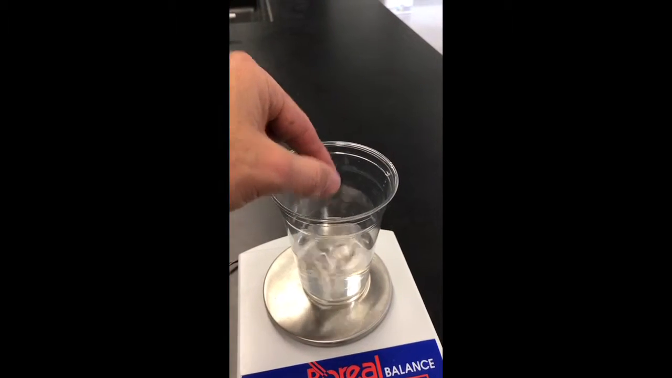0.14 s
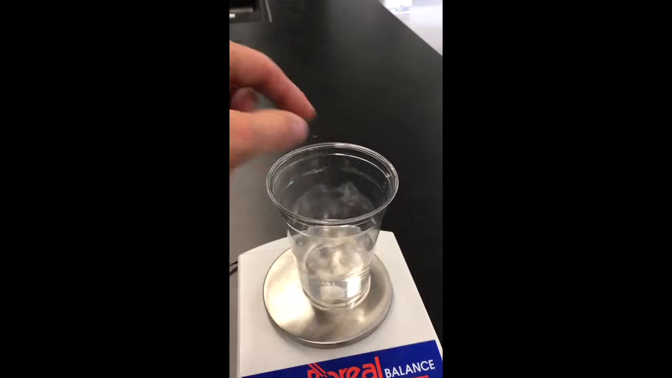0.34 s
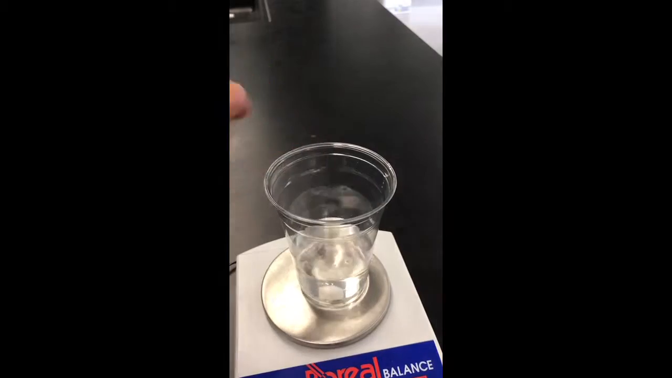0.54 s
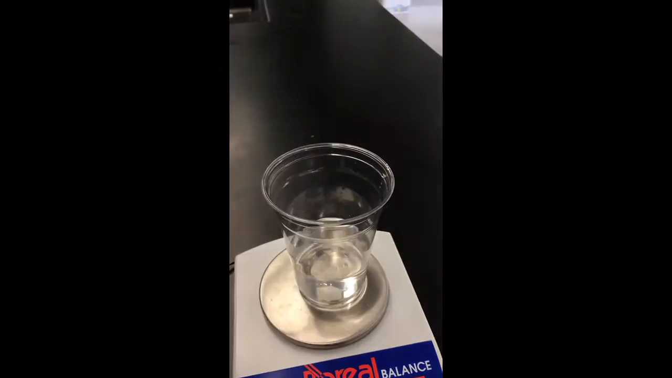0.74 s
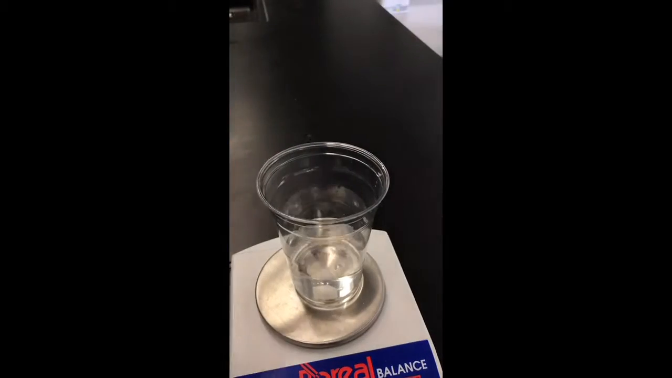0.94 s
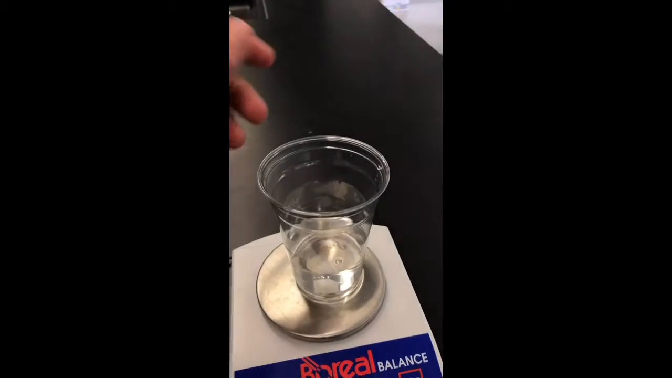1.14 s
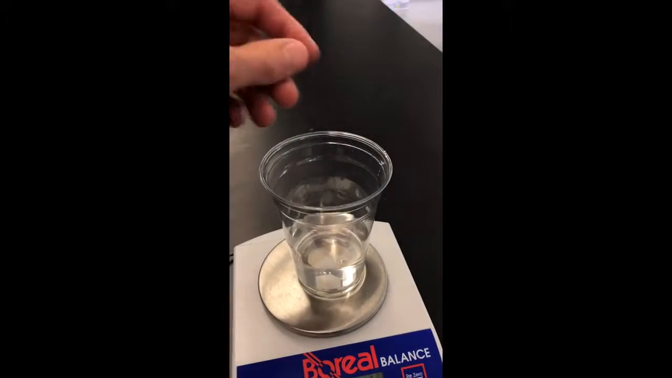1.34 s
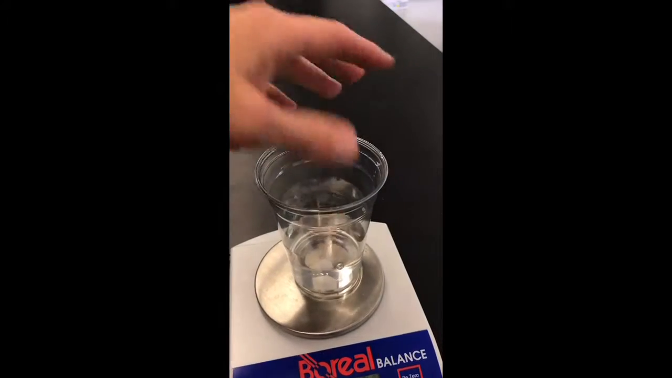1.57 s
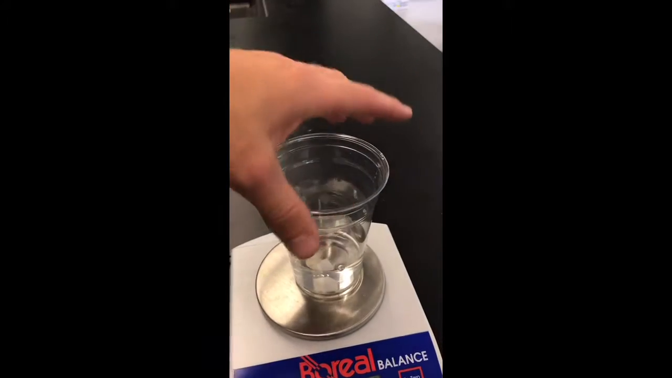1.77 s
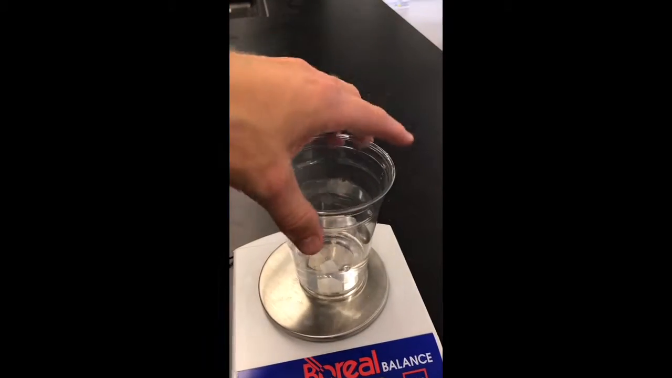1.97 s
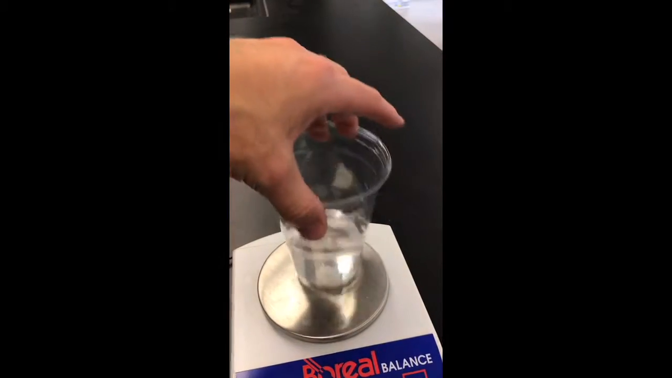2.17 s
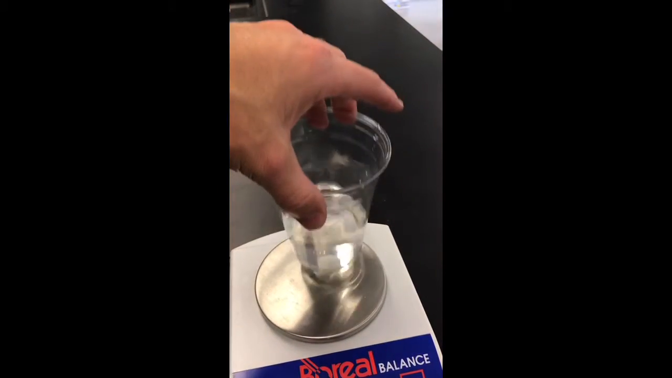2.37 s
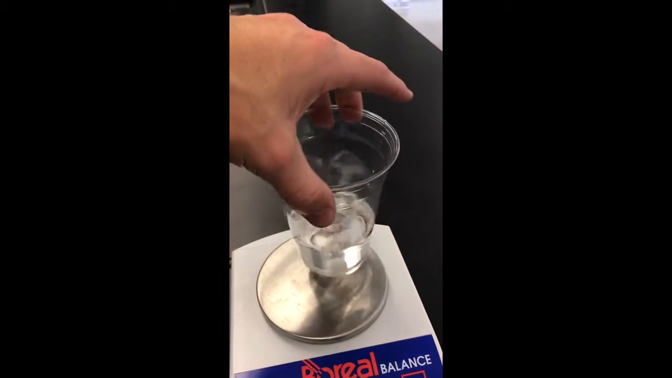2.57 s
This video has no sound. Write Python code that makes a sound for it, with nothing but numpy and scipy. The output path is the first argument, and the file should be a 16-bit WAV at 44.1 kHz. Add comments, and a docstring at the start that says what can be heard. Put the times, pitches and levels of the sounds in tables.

```python
"""Sugar cube in a plastic cup

A cube drops into a thin plastic cup with a little water: struck modes and noisy cracks make the knocks
and the settling rattle, and short swelling sines make the plops of closing air pockets.
Small ticks, short pitched noise bursts, are scattered before, among and after the knocks;
later something rubs on the cup, as resonant noise and hiss.
A quiet hard room answers with one wall echo and a decaying noise tail.
Behind it all lie patchy ventilation noise, wavering hum lines and a thin high whistle."""
import sys
import numpy as np
from scipy import signal
from scipy.fft import rfft, irfft, next_fast_len
from scipy.io import wavfile
from scipy.ndimage import uniform_filter1d, map_coordinates

SR = 44100
rng = np.random.default_rng(int(sys.argv[2]) if len(sys.argv) > 2 else 0)


def volts_from_decibels(level):
    """Turn decibel levels (scalar or array-like) into linear amplitude factors."""
    exponent = np.asarray(level, float) / 20
    return 10 ** exponent


def int16_out(signal):
    """Quantize to a 16-bit WAV file."""
    q = np.round(np.clip(np.atleast_2d(signal).T, -1, 1) * 32767)
    wavfile.write(sys.argv[1], SR, q.astype(np.int16))


N = 114660  # length in samples

# Spectrum of room air and microphone hiss, relative per Hz: [f/Hz, level/dB]
AIR_SPECTRUM = [(12, -59), (20, -29), (44, -2), (104, 1.5), (162, -4), (227, -6), (300, -11), (335, -13.5),
                (456, -15), (969, -16), (2060, -24.5), (4250, -28), (4890, -30.5), (5470, -29.5),
                (15800, -34.5)]
AIR_RMS_DB, PATCHY_RMS_DB = -55, 1.22
# Motor and mains lines: [f/Hz, rms level/dB, waver/dB, waver rate/(knots per s)]
HUM_LINES = [(59, -63.5, 6, 11.7), (119.4, -58.5, 0.5, 8.22), (197.8, -65, 3.5, 8.98),
             (232.8, -60, -0.6, 4.62), (290.8, -61, 1.6, 4.9), (354.3, -75, 4.5, 6.4),
             (407.2, -77, 2, 7.37)]
# Course of the whistle's loudness: [t/s, rms level/dB]
WHISTLE_COURSE = [(0.0, -87), (0.05, -78), (0.21, -81), (0.23, -71), (0.27, -75), (0.35, -87), (0.42, -77),
                  (0.48, -94), (0.72, -77), (0.77, -97), (1.04, -91), (1.22, -87), (1.27, -81), (1.3, -85),
                  (1.37, -74), (1.45, -87), (1.87, -92), (2.6, -84)]
WHISTLE_HZ = 15228
# Decay time of the hard room: [f/Hz, t60/s]
ROOM_DECAY = [(300, 0.85), (1000, .45), (3000, 0.37), (6000, 0.37), (9000, 0.3), (13000, 0.18)]
ROOM_DB, ROOM_DELAY_S, ROOM_RISE_S = -21, 0.02, 0.006
WALL_DB, WALL_DELAY_S = -23.5, 0.027  # the nearest wall's single echo
PLOP_ROOM_DB = -2  # the cup shields the plops from the room
# Rubs on the cup: [start t/s, rise t/s, fall t/s, squeak level/dB, hiss level/dB]
RUBS = [(1.44, 0.021, .03, -89, -66.5), (1.996, 0.019, 0.019, -51.5, -58),
        (2.074, 0.011, 0.014, -59.5, -64), (2.095, 0.012, 0.019, -54.5, -60.5)]
# Narrow resonances of the squeak: [f/Hz, width f/Hz, relative level/dB]
SQUEAK_RESONANCES = [(1680, 160, -6.5), (2710, 170, 3), (4480, 300, -14), (5800, 300, -16)]
# Spectrum of the rubbing hiss, relative per Hz: [f/Hz, level/dB]
HISS_SPECTRUM = [(800, 0.5), (2000, -10), (6000, -1.5), (15000, -10)]
# Small ticks of fingers, droplets and plastic:
# [t/s, snap level/dB, pitch f/Hz, width/octaves, thump level/dB]
TICKS = [(0.171, -52, 10900, .8, -85), (.2350, -28.5, 9000, 0.35, -90), (0.668, -58.5, 6950, .1, -90),
         (.726, -58, 6200, .1, -90), (1.109, -54.5, 11000, 0.16, -85), (1.556, -59, 13500, .3, -90),
         (2.2887, -53, 5500, 0.17, -47), (2.288, -54, 3400, .25, -90), (2.4025, -58.5, 2720, 0.29, -77),
         (2.4843, -51.5, 4060, 0.07, -49), (2.485, -46, 2800, 0.092, -90)]
TICK_T60_S = 0.011
THUMP_HZ, THUMP_T60_S = 880, 0.03
# Air pockets closing in the water:
# [t/s, level/dB, pitch f/Hz, rise t/s, hold t/s, release t/s]
PLOPS = [(.2298, -21.5, 893, 0.0011, 0.0044, 0.0033), (.2350, -23.5, 916, 0.00236, 0.0032, 0.0023),
         (.2330, -35.5, 635, 0.007, .006, .012), (.2300, -43.5, 283, .007, .007, .012),
         (.2520, -47.5, 640, 0.0057, 0.0064, 0.0071), (.2480, -46.5, 520, 0.0044, 0.012, 0.018),
         (.2700, -43.5, 580, .004, 0.0063, 0.006), (.3150, -54, 940, 0.01, .008, .012)]
# Cube against the cup: [t/s, level/dB, centre f/Hz, width/octaves, crack level/dB]
KNOCKS = [(0.2295, -20.5, 4440, 1.4, -4.5), (0.2298, -14.5, 1900, 1.3, -9), (.2316, -15, 1490, .8, -15),
          (0.2342, -27, 4500, 2.6, -5.5), (0.2385, -20.5, 2970, 0.38, -8.5), (.2425, -22, 1760, 0.62, -14),
          (0.248, -32, 2200, 0.71, -16), (.4100, -36.5, 2120, 0.45, -18), (0.413, -34, 1000, .3, -30)]
# Modes of the cup: [f/Hz, relative level/dB]
CUP_MODES = [(880, -8), (1020, -4), (1200, -6.5), (1370, -0.5), (1760, -3.5), (1900, 1.5), (2070, -6.5),
             (2400, -4.5), (2700, -4.5), (2950, -4.5), (3500, -12), (4030, -7), (4450, -5.5), (4950, -5.5),
             (5600, -3)]
CUP_T60_S, TREBLE_DAMPING = 0.034, 0.3  # t60 at 1 kHz; it falls with this power of pitch
MODE_SCATTER_DB, ATTACK_S = 1.5, 0.00015
CUP_LOW_HZ = 700  # the thin wall radiates little below this
# Splash and crack of a knock, relative per Hz: [f/Hz, level/dB]
CRACK_SPECTRUM = [(1200, -15), (2200, -9), (4200, -0.5), (6300, -5), (9000, -10.5), (11500, -17),
                  (15800, -29)]
CRACK_T60_S = 0.018
# Treble colour of the microphone: [f/Hz, level/dB]
MIC_COLOUR = [(6500, 0), (7600, -1), (9000, 0.5), (10400, -2), (12500, 1)]


def unit(x):
    """Scale to rms 1."""
    return x / np.sqrt(np.mean(x ** 2) + 1e-20)


def along(points, hz):
    """Read a [frequency, value] curve on a log frequency axis."""
    f, value = np.transpose(points)
    return np.interp(np.log(hz + 1), np.log(f + 1), value)


def gain_along(points):
    """Turn a [frequency, dB] curve into a gain for any frequency."""
    return lambda hz: volts_from_decibels(along(points, hz))


def focus(centre_hz, octaves):
    """A bell-shaped band on a log frequency axis."""
    return lambda hz: np.exp(-0.5 * (np.log2((hz + 1) / centre_hz) / octaves) ** 2)


def filtered(x, response):
    """Shape the spectrum of x with a response of frequency."""
    size = next_fast_len(len(x) + 8192)
    spectrum = rfft(x, size) * response(np.fft.rfftfreq(size, 1 / SR))
    return irfft(spectrum, size)[:len(x)]


def wobble(rate):
    """A smooth random curve through so many knots a second."""
    knots = rng.standard_normal(N // 40)
    return map_coordinates(knots, [np.arange(N) * rate / SR])


def tone(hz):
    """A steady sine of rms 1 with a random starting phase."""
    t = np.arange(N) / SR
    return np.sqrt(2) * np.sin(2 * np.pi * (hz * t + rng.random()))


def delayed(x, seconds):
    """Put silence ahead of a sound."""
    return np.pad(x, (round(seconds * SR), 0))


def add(track, s, sound):
    """Lay a sound into the track at a time in seconds."""
    part = track[round(s * SR):][:len(sound)]
    part += sound[:len(part)]


def burst(colour, t60):
    """A puff of coloured noise with a fast attack and an exponential decay."""
    t = np.arange(SR // 8) / SR
    noise = unit(filtered(rng.standard_normal(len(t)), colour))
    return noise * volts_from_decibels(-60 * t / t60) * (1 - np.exp(-t / ATTACK_S))


def air():
    """Ventilation noise whose level is slightly patchy over time and frequency."""
    z = signal.stft(rng.standard_normal(N), nperseg=512)[2]
    field = uniform_filter1d(rng.standard_normal(z.shape), size=5, axis=0)  # blur over frequency
    field = uniform_filter1d(field, size=12, axis=1)  # blur over time
    patchy = signal.istft(z * volts_from_decibels(PATCHY_RMS_DB * unit(field)), nperseg=512)[1][:N]
    return volts_from_decibels(AIR_RMS_DB) * unit(filtered(patchy, gain_along(AIR_SPECTRUM)))


def hum():
    """Motor and mains lines: sines that each waver in level at their own pace."""
    return sum(volts_from_decibels(db + waver_db * wobble(rate)) * tone(hz) for hz, db, waver_db, rate in HUM_LINES)


def whistle():
    """One thin, very high sine that swells and fades."""
    level_db = np.interp(np.arange(N) / SR, *np.transpose(WHISTLE_COURSE))
    return volts_from_decibels(level_db) * tone(WHISTLE_HZ)


def room(x):
    """Walls answer after a gap with a noise tail; each frequency dies at its own speed."""
    hz, t, z = signal.stft(rng.standard_normal(SR), SR, nperseg=256)
    decay = volts_from_decibels(-60 * t / along(ROOM_DECAY, hz)[:, None])
    tail = signal.istft(z * decay, SR, nperseg=256)[1]
    tail = tail * (1 - np.exp(-np.arange(len(tail)) / SR / ROOM_RISE_S))
    return signal.fftconvolve(delayed(x, ROOM_DELAY_S), tail / np.linalg.norm(tail))[:N]


def squeak_body(hz):
    """Response of the squeak's resonances, neighbours in opposite polarity."""
    response = 0
    for k, (centre, width, db) in enumerate(SQUEAK_RESONANCES):
        damping = 1j * hz * width
        response = response + (-1) ** k * volts_from_decibels(db) * damping / (centre * centre - hz * hz + damping)
    return response


def rubs():
    """Rubbing friction: noise excites narrow resonances over a broad hiss, in short swells."""
    t = np.arange(N) / SR
    squeak = unit(filtered(rng.standard_normal(N), squeak_body))
    hiss = unit(filtered(rng.standard_normal(N), gain_along(HISS_SPECTRUM)))
    out = np.zeros(N)
    for s, rise, fall, squeak_db, hiss_db in RUBS:
        swell = np.interp(t, [s, s + rise, s + rise + fall], [0, 1, 0]) ** 0.5
        out += swell * (volts_from_decibels(squeak_db) * squeak + volts_from_decibels(hiss_db) * hiss)
    return out


def ticks():
    """Short pitched noise snaps, each over the cup's hollow thump, often far too faint to hear."""
    out, t = np.zeros(N), np.arange(SR // 8) / SR
    thump = volts_from_decibels(-60 * t / THUMP_T60_S) * np.sin(2 * np.pi * THUMP_HZ * t)
    for s, db, pitch_hz, octaves, thump_db in TICKS:
        snap = burst(focus(pitch_hz, octaves), TICK_T60_S)
        add(out, s, volts_from_decibels(db) * snap + volts_from_decibels(thump_db) * thump)
    return out


def plops():
    """Air pockets closing in the water: short hollow sines that swell, hold and stop."""
    out = np.zeros(N)
    for s, db, hz, rise, hold, release in PLOPS:
        t = np.arange(N) / SR - s
        swell = np.interp(t, np.cumsum([0, rise, hold, release]), [0, 1, 1, 0]) ** 2
        out += volts_from_decibels(db) * swell * np.sin(2 * np.pi * hz * t)
    return out


def ring(colour):
    """The cup's modes struck once: sines that die away, the higher the sooner."""
    t = np.arange(SR // 8) / SR
    hz, db = np.transpose(CUP_MODES)[:, :, None]
    level_db = db + MODE_SCATTER_DB * rng.standard_normal(hz.shape)
    t60 = CUP_T60_S * (hz / 1000) ** -TREBLE_DAMPING
    sign = (-1) ** np.arange(len(hz))[:, None]  # neighbouring modes move the air in opposite senses
    modes = sign * colour(hz) * volts_from_decibels(level_db - 60 * t / t60) * np.sin(2 * np.pi * hz * t)
    return modes.sum(0) * (1 - np.exp(-t / ATTACK_S))


def cube_knocks():
    """Each knock rings the cup and cracks, favouring its own pitch; the thin wall sheds the lows."""
    out = np.zeros(N)
    for s, db, centre_hz, octaves, crack_db in KNOCKS:
        near = focus(centre_hz, octaves)
        crack = burst(lambda hz: gain_along(CRACK_SPECTRUM)(hz) * near(hz) ** 0.22, CRACK_T60_S)
        add(out, s, volts_from_decibels(db) * (ring(near) / 2 + volts_from_decibels(crack_db) * crack))
    return filtered(out, lambda hz: (1j * hz / (CUP_LOW_HZ + 1j * hz)) ** 2)


def scene():
    """Mix the near sounds, their wall echo and room tail, and the background."""
    hard = ticks() + rubs() - cube_knocks()  # knocks in opposite polarity
    water = plops()
    sent = hard + volts_from_decibels(PLOP_ROOM_DB) * water
    echo = delayed(sent, WALL_DELAY_S)[:N]
    reflections = volts_from_decibels(WALL_DB) * echo + volts_from_decibels(ROOM_DB) * room(sent)
    background = air() + hum() + whistle()
    return (hard + water + reflections + background)[None]


def roll_off(x):
    """The treble ends steeply here."""
    return signal.sosfilt(signal.butter(12, 16060, fs=SR, output="sos"), x)


def record(dry):
    """Colour the mix with the phone microphone's treble response."""
    mix = filtered(dry[0], gain_along(MIC_COLOUR))[None]
    return roll_off(mix)


dry = scene()
out = record(dry)
int16_out(out)
```